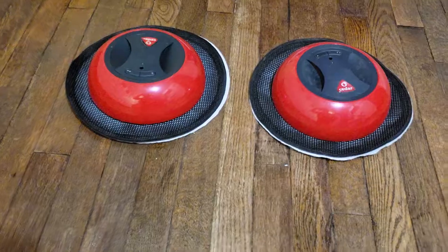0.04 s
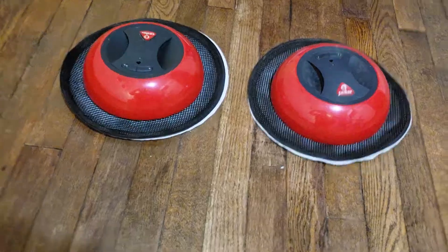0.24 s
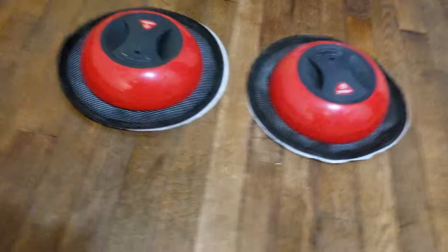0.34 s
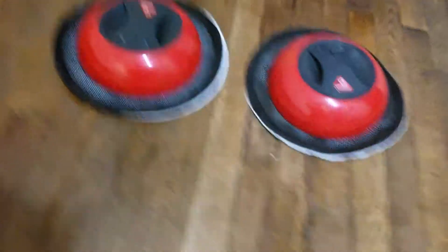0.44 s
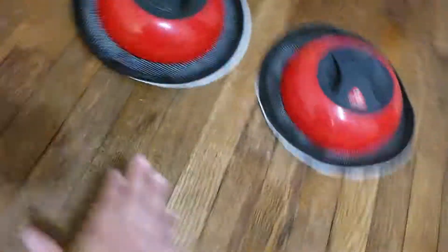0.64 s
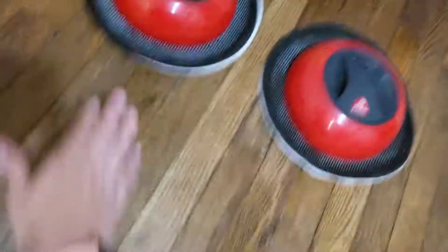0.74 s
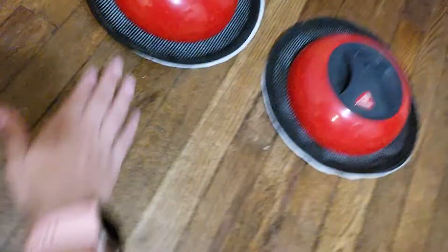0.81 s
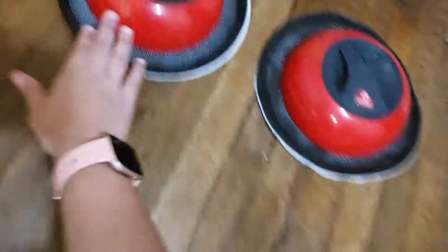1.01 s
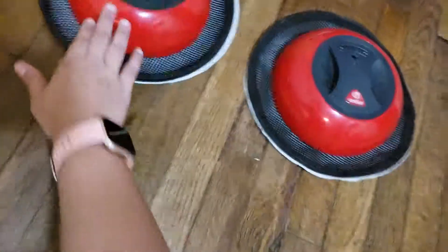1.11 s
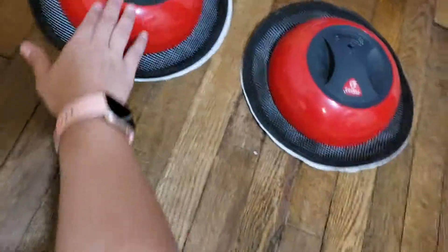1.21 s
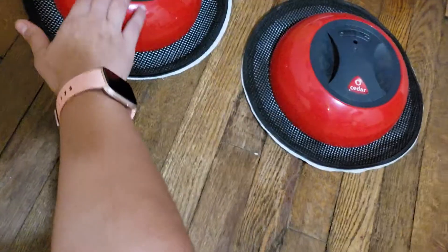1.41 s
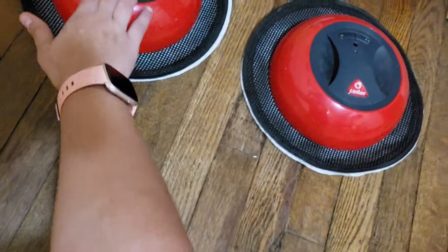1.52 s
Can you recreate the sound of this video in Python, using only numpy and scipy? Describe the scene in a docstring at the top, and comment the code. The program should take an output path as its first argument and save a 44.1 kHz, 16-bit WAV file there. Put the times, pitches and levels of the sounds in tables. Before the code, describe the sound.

From about 0.2 to 0.6 seconds, moving air buffets the microphone with low rumbling puffs, mostly on the right. Clothes swish near 0.4 seconds and again until about 0.9, with a few small handling ticks. Around 0.85 seconds, shifting weight gives a wooden floor a soft, deep bump that fades. A quiet fan rush and a wavering appliance hum continue throughout, ending at about 1.5 seconds.

```python
"""Moving air buffets a camera's right microphone as someone bends down for a duster.
Their clothes rub and swish, handling makes small ticks, and their shifting weight
gives the wooden floor a soft, deep bump. Behind it all, a fan and a duct rush quietly
and an appliance hums; its tones swell and fade as the camera moves."""
import sys
import numpy as np
from scipy.fft import rfft, irfft, next_fast_len
from scipy.io import wavfile
from scipy.ndimage import map_coordinates

SR = 44100
rng = np.random.default_rng(int(sys.argv[2]) if len(sys.argv) > 2 else 0)


def file_out(sig):
    """Save sig as 16-bit WAV at sys.argv[1]."""
    # one column per channel
    cols = np.atleast_2d(sig).T
    # limit, then scale
    lim = np.clip(cols, -1, 1)
    pcm = np.round(lim * 32767).astype(np.int16)
    wavfile.write(sys.argv[1], SR, pcm)


N = 68355

# weight shifting onto the floor (time [s], level [dB], half width [s])
FLOOR_PUSHES = [(0.836, -36, 0.0031), (.861, -34.5, 0.0031), (.883, -34, 0.0027), (0.961, -46, 0.0096)]


def buffeting():
    """Swirling air rumbles and puffs on the right microphone; the left hears little of it."""
    # strength of the moving air (time [s], level [dB])
    draught = [(.19, -73), (.218, -39), (.26, -29), (.298, -39), (.32, -34), (.365, -23.5), (.40, -23.5),
               (.45, -30.5), (.505, -21.5), (.53, -33), (.56, -35.5), (.585, -51), (.63, -53), (.70, -69)]
    # the deep sound of its swirls (frequency [Hz], level [dB])
    swirls = [(20, -13), (45, -1), (90, 6.5), (140, 0), (220, -11), (320, -17.5), (450, -26.5),
              (1000, -52.5), (3000, -80)]
    # the strongest swirls, each a suck and then a push (time [s], level [dB], half width [s])
    puffs = [(.281, -29.5, 0.0013), (0.3657, -26.5, 0.0012), (0.3761, -17, 0.0018), (0.421, -14.5, 0.0016),
             (0.4895, -25, .0015)]
    rumble = gains(draught) * noise(swirls)
    thumps = sum(amp(db) * push(s, width) for s, db, width in puffs)
    right_only = np.array([[0], [1]])
    return (rumble + thumps * right_only) * amp([[-25], [-1]])  # left, right dB


def floor_bump():
    """Soft pushes set the floorboards swinging, the same on both sides."""
    # the boards' own low notes (frequency [Hz], level [dB], time to fade by 60 dB [s])
    boards = [(46.5, -0.5, 0.25), (65.4, 3.5, 0.12), (122, -4.5, 0.054)]
    ring_db, ring_rise_s = -0.5, 0.0051
    out = np.zeros(N)
    for s, db, width in FLOOR_PUSHES:
        t = time_since(s)
        ring = sum(amp(level - 60 * t / fade) * np.sin(2 * np.pi * hz * t) for hz, level, fade in boards)
        rise = 1 - np.exp(-t / ring_rise_s)
        out += amp(db) * (push(s, width) + amp(ring_db) * ring * rise)
    return out


def floor_shudder():
    """A low rumble lingers in the floor after the first push."""
    # the sound of the shaking floor (frequency [Hz], level [dB])
    rumble = [(20, -8), (50, -2), (100, -9.5), (200, -14), (350, -15.5), (600, -16), (2000, -58)]
    level_db, fade_s, rise_s = -47, 1.16, 0.08
    t = time_since(FLOOR_PUSHES[0][0])
    return amp(level_db - 60 * t / fade_s) * (1 - np.exp(-t / rise_s)) * noise(rumble)[0]


def clothes():
    """Each stroke of cloth swells and dies: a grainy rub, with a fine fizz of fibres on the left."""
    # strokes (time [s], level [dB], rise [s], fall [s], extra fizz [dB])
    swishes = [(.385, -65.5, 0.1, 0.18, 0.5), (0.414, -58, 0.016, 0.06, -13), (0.674, -63, 0.46, 0.22, 5),
               (0.866, -56.5, 0.021, 0.085, 1.5)]
    # cloth rubbing (frequency [Hz], level [dB])
    cloth = [(200, -17), (600, 7), (1300, 1), (3000, -3), (4700, -3), (6800, -5.5), (9000, -13),
             (15000, -18)]
    # which side the rub leans to (frequency [Hz], left minus right [dB])
    balance = [(700, -6.5), (1400, -2.5), (2500, -4.5), (4500, -2.5), (8000, 3.5), (12000, 10)]
    # fibres fizzing (frequency [Hz], level [dB])
    fibres = [(3000, -44), (6500, -26), (9000, -15), (11000, -2.5), (15500, -5)]
    t, out = np.arange(N) / SR, np.zeros((2, N))
    for s, db, rise, fall, fizz_db in swishes:
        grainy_level = amp(db + 0.63 * wobble(250))
        swell = 2 * np.exp(-np.logaddexp(2 * (s - t) / rise, 2 * (t - s) / fall))  # a rounded hill
        rub = filtered(noise(cloth), lambda hz: pan(along(balance, hz)))
        fizz = amp(fizz_db - 8.5) * pan(db=20) * noise(fibres)
        out += grainy_level * swell * (rub + fizz)
    return out


def plastic_click():
    """A small piece of plastic clicks and rings for a few milliseconds."""
    # its notes (frequency [Hz], level [dB], time to fade by 60 dB [s], left minus right [dB])
    notes = [(1030, -7, 0.0046, 1), (1650, -4, 0.0047, -4), (2530, -0.5, 0.0082, -31),
             (3800, -1.5, 0.0052, -18), (5600, -4.5, 0.0048, 17), (6800, -9.5, 0.01, 22)]
    t, level_db = time_since(0.3953), -40.5
    return sum(pan(side_db) * amp(level_db + db - 60 * t / fade) * np.sin(2 * np.pi * hz * t)
               for hz, db, fade, side_db in notes)


def handling_ticks():
    """Handling makes short, dry snaps, each a quick burst of noise."""
    # snaps (time [s], level [dB], frequency [Hz], time to fade by 60 dB [s], left minus right [dB])
    snaps = [(.4265, -54.5, 12000, .014, 9), (0.428, -55, 2430, 0.045, -16), (0.582, -52.5, 1600, .03, 10),
             (0.73, -56.5, 5470, .02, 0), (1.434, -64.5, 3000, 0.017, -2)]
    out = np.zeros((2, N))
    for s, db, hz, fade, side_db in snaps:
        t = time_since(s)
        out += (t > 0) * amp(db - 60 * t / fade) * pan(side_db) * band(hz, octaves=0.42)
    return out


def room_air():
    """A fan rushes steadily while a duct rings with one fluttering note."""
    # the fan's rush (frequency [Hz], level [dB])
    rush = [(20, 0.5), (50, -11), (85, -12), (180, -16), (280, -11.5), (400, -4), (560, 5), (680, -6),
            (900, -5.5), (1200, -16.5), (1650, -8), (2100, -18.5), (2800, -11), (3800, -18), (4800, -25),
            (6500, -28), (9000, -34.5), (11000, -28.5), (15500, -34.5)]
    # which side it leans to (frequency [Hz], left minus right [dB])
    balance = [(60, 4), (110, -4), (200, 1), (380, 2), (700, -2), (1290, 0.5), (2380, -11.5), (4400, -10.5),
               (8120, 3), (15000, 3)]
    # its loudness (time [s], level [dB])
    fan_level = [(0, -59), (.4, -54.5), (.8, -56), (1.0, -55), (1.55, -56)]
    # loudness of the duct's note (time [s], level [dB])
    duct_level = [(0, -84), (.75, -66), (1.0, -57.5), (1.18, -69.5), (1.28, -53.5), (1.35, -55.5),
                  (1.41, -64), (1.55, -60.5)]
    fan = filtered(spread(noise(rush)), lambda hz: pan(along(balance, hz)))
    duct = pan(db=4.5) * spread(band(centre_hz=561, octaves=0.064))
    return gains(fan_level) * fan + gains(duct_level) * duct


def appliance():
    """A motor's tones swell and fade as the camera passes the room's loud and quiet spots."""
    # the low hum (time [s], level [dB])
    hum_level = [(0, -69), (.1, -67), (.17, -75), (.6, -62.5), (.8, -62.5), (1.0, -65.5), (1.2, -64),
                 (1.33, -61), (1.55, -65.5)]
    # the higher whine (time [s], left level [dB], right level [dB])
    whine_level = [(0, -63, -74), (.4, -60, -68), (.8, -58, -81), (1.1, -68.5, -62.5), (1.45, -65, -59.5),
                   (1.55, -76, -56)]
    # the thin whistle (time [s], left level [dB], right level [dB])
    whistle_level = [(0, -72.5, -74), (.35, -70, -74), (.6, -65, -69), (.78, -83, -81), (.95, -82, -67.5),
                     (1.12, -64.5, -63), (1.35, -68, -61.5), (1.55, -75, -61)]
    hum_hz, whine_hz, whistle_hz = 116.9, 809.5, 1385
    waver_db, rough_db, whine_lag = 1.5, 2.5, 2.32
    hum = gains(hum_level) * amp(waver_db * wobble(14.4)) * tone(hum_hz, drift_hz=2.8, rate=12.2)
    roughness = amp(rough_db * wobble(70))
    whine = gains(whine_level) * roughness * tone(whine_hz, drift_hz=2, rate=30, lag=whine_lag)
    overtone = amp(-69) * tone(2 * whine_hz, drift_hz=3.96, rate=30, lag=whine_lag)
    whistle = gains(whistle_level) * tone(whistle_hz, drift_hz=0.99, rate=17, lag=2.1)
    return hum + whine + overtone + whistle


def spread(pair):
    """Mix two unrelated noises into left and right, nearly the same in the bass."""
    # how alike the sides are (frequency [Hz], likeness [1 same, 0 unrelated, -1 opposite])
    likeness = [(60, 1), (130, 0.68), (290, 0.91), (640, 0.53), (1410, -0.36), (3100, 0.019), (6820, 0.011),
                (15000, -0.063)]

    def shares(hz):
        angle = np.arccos(np.clip(along(likeness, hz), -1, 1)) / 2
        return np.array([np.cos(angle), np.sin(angle)])

    middle, side = filtered(pair, shares)
    return np.array([middle + side, middle - side])


def amp(db):
    """Turn decibels into a gain, the number a sound is multiplied by."""
    return 10 ** (np.asarray(db) / 20)


def unit(x):
    """Scale a sound to an average strength (rms) of 1."""
    return x / np.sqrt(np.mean(x ** 2) + 1e-20)


def time_since(s):
    """Seconds since time s; zero before it."""
    return np.maximum(np.arange(N) / SR - s, 0)


def along(points, hz):
    """Read between (frequency, value) points, with octaves evenly spaced."""
    frequencies, values = np.transpose(points)
    return np.interp(np.log(hz + 1), np.log(frequencies + 1), values)


def gains(rows):
    """One gain per sample for each dB column after the time."""
    times, *levels = np.transpose(rows)
    return amp([np.interp(np.arange(N) / SR, times, db) for db in levels])


def wobble(rate):
    """A smooth curve through rate random points a second."""
    points = rng.standard_normal(int(N * rate / SR) + 4)
    return map_coordinates(points, [np.arange(N) * rate / SR])


def filtered(x, response):
    """Turn each frequency of x up or down by the gain response(hz)."""
    size = next_fast_len(N + SR // 4)
    hz = np.fft.rfftfreq(size, 1 / SR)
    return irfft(rfft(x, size) * response(hz), size)[..., :N]


def pan(db):
    """Gains that make the left db louder than the right, keeping the total power."""
    sides = amp(np.array([db, -db]).reshape(2, -1) / 2)
    return sides / np.sqrt(np.mean(sides ** 2, axis=0))


def band(centre_hz, octaves):
    """Two unrelated noises in a bell-shaped band around one pitch."""
    white = rng.standard_normal((2, N))
    return unit(filtered(white, lambda hz: np.exp(-.5 * (np.log2((hz + 1) / centre_hz) / octaves) ** 2)))


def noise(spectrum):
    """Two unrelated noises shaped by (frequency, level) points."""
    return unit(filtered(rng.standard_normal((2, N)), lambda hz: amp(along(spectrum, hz))))


def push(s, width):
    """One smooth pressure swing around time s: down to -1, then up to 1."""
    offset = (np.arange(N) / SR - s) / width
    return offset * np.exp(.5 * (1 - offset ** 2))


def tone(hz, drift_hz, rate, lag=0):
    """A slightly unsteady pure tone that reaches the left side lag radians late."""
    cycles = np.cumsum(hz + drift_hz * wobble(rate)) / SR
    phase = 2 * np.pi * (cycles + rng.random())
    return np.sqrt(2) * np.sin(np.array([phase - lag, phase]))


def scene():
    """Movement close to the camera, over the room's hum."""
    movement = buffeting() + floor_bump() + floor_shudder() + clothes()
    return movement + plastic_click() + handling_ticks() + room_air() + appliance()


def record(dry):
    """The camera cuts off the very highest treble."""
    return filtered(dry, lambda hz: hz < 15800)


dry = scene()
out = record(dry)
file_out(out)
```